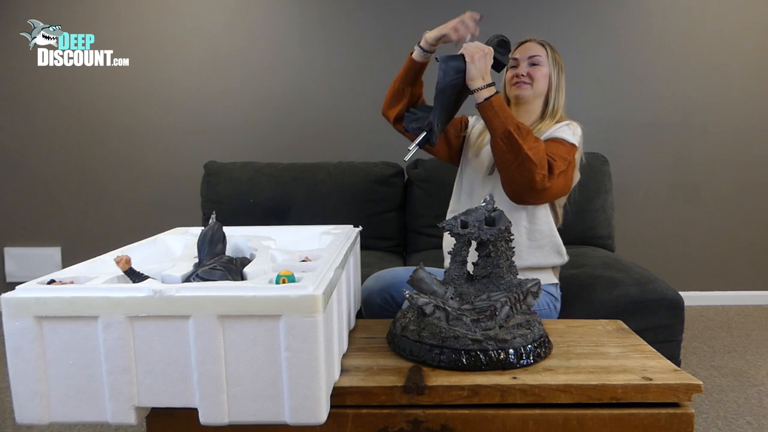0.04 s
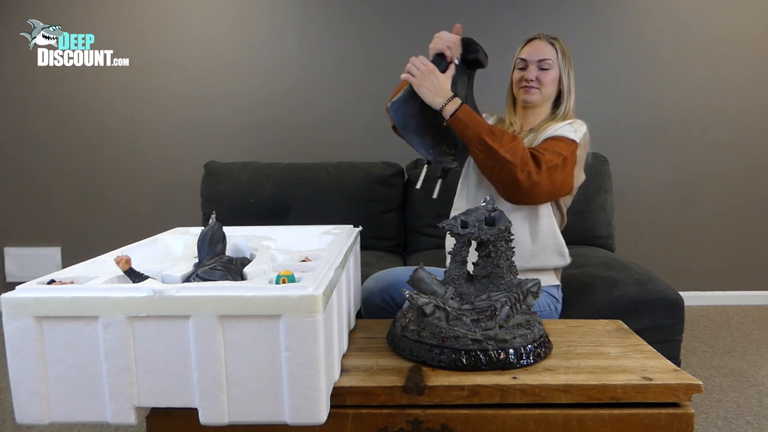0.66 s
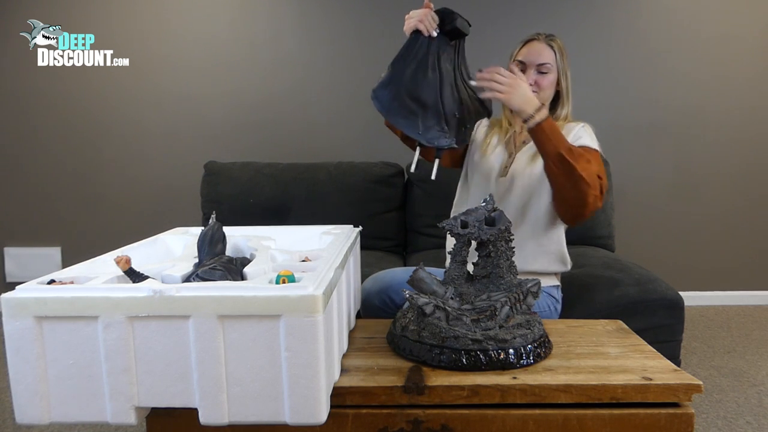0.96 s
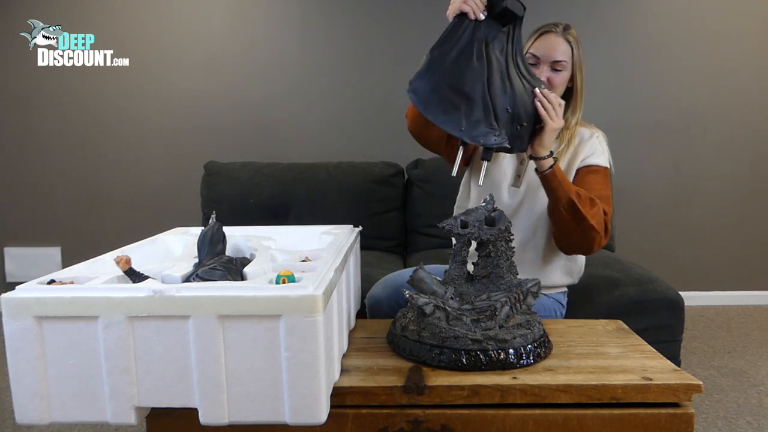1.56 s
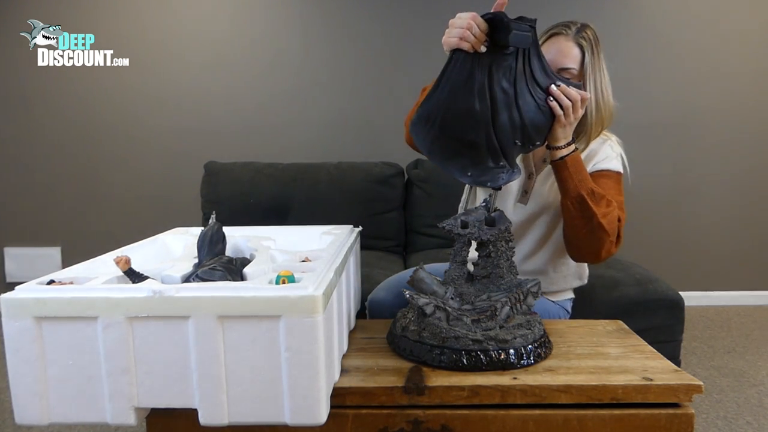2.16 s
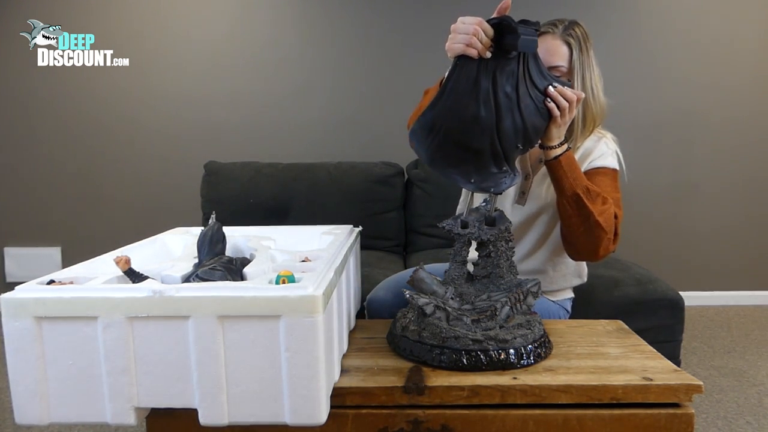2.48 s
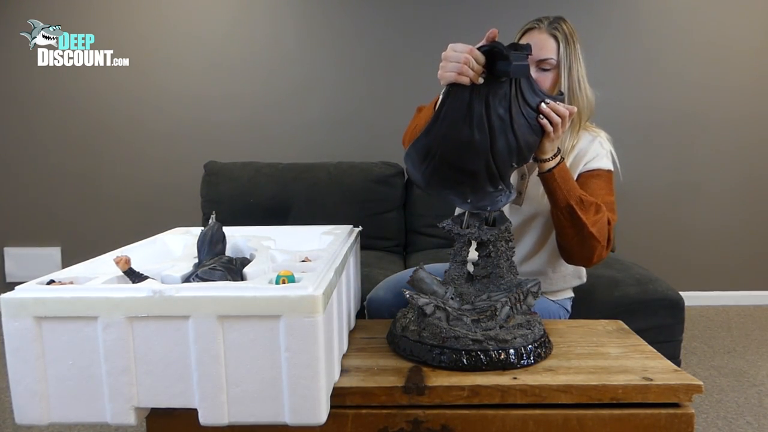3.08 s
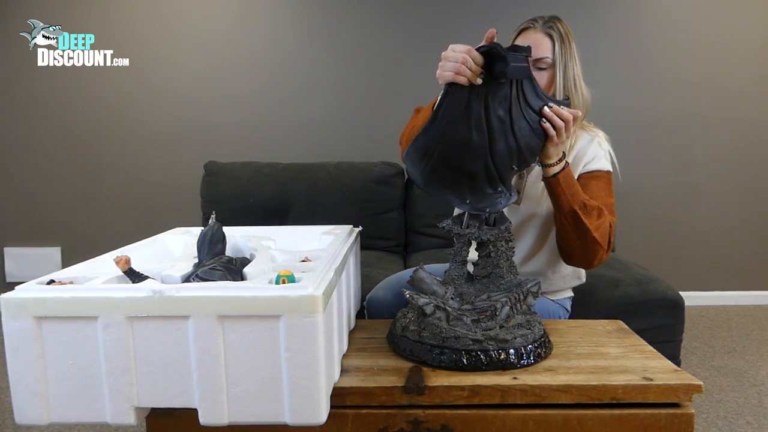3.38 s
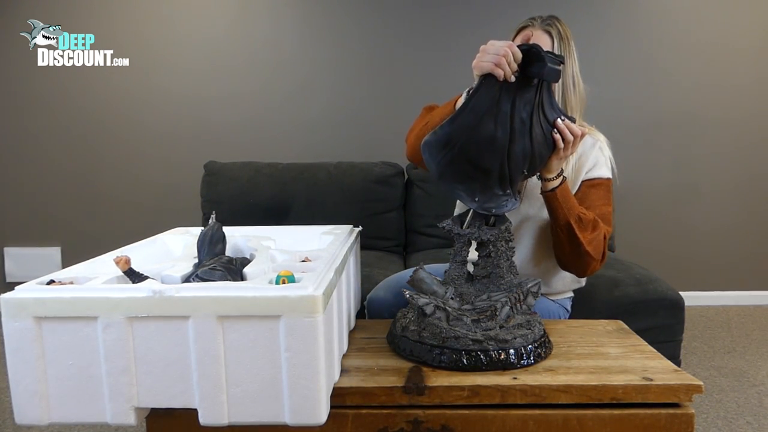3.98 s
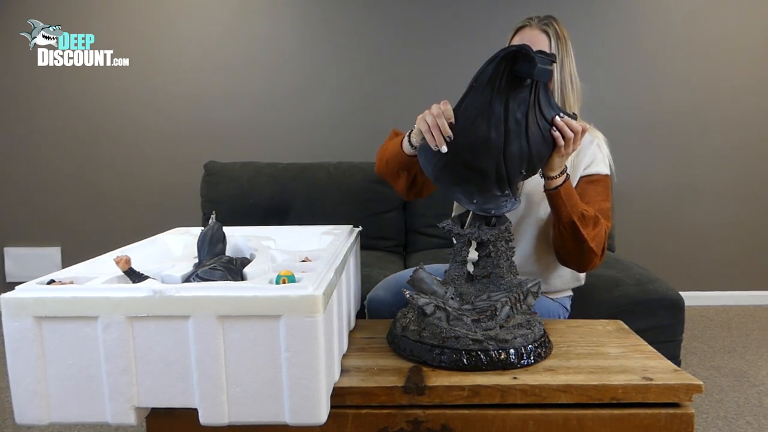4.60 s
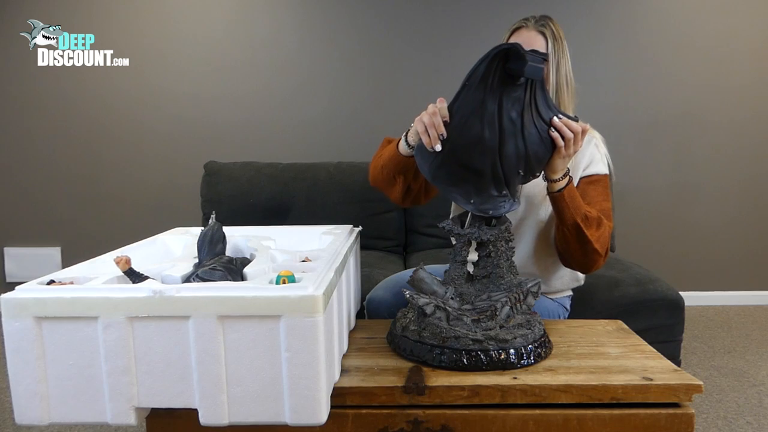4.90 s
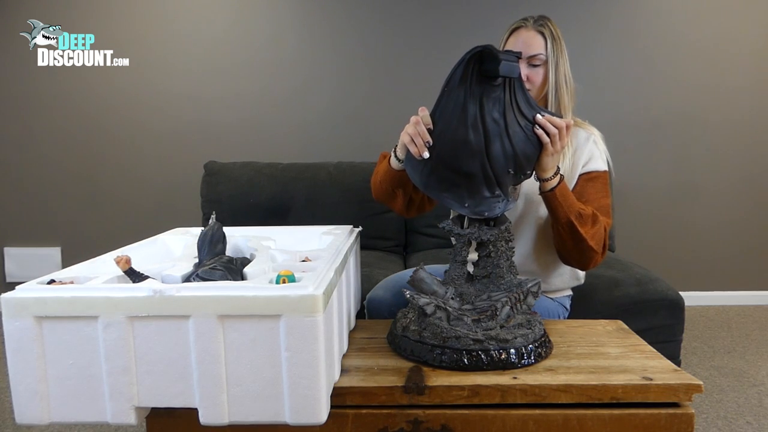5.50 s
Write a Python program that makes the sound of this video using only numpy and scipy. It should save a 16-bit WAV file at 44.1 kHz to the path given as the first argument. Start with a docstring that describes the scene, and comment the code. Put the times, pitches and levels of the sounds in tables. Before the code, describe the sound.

In a small living room, a heavy resin statue part is fitted onto its base on a wooden table. Quiet brushing of hands and cloth gives way to hard, hollow clacks with low wooden thumps. Metal pegs tap, squeak and scrape in search of their holes, then snap home after a sharp knock, ending in a short grind and a few clicks. The microphone holds everything centred over low room rumble and faint hiss.

```python
"""Fingers and sleeves rustle softly over a heavy, hollow resin statue piece as it is turned in the hands.
Then it lands on its base with a sharp clack: shell and base ring, and each blow thumps the wooden table.
Its steel pegs knock, skid and squeak over the base, grate in their sockets and snap home; resin grinds
on resin as it sinks in. All sits near mono in a small living room, over low rumble and faint mic hiss."""
import sys
import numpy as np
from scipy import signal
from scipy.fft import rfft, irfft, next_fast_len
from scipy.io import wavfile

SR = 44100
rng = np.random.default_rng(int(sys.argv[2]) if len(sys.argv) > 2 else 0)


def generate_wav(sig):
    """Save sig (samples, or channels by samples) to the path in sys.argv[1] as 16-bit PCM at SR."""
    pcm = np.round(np.clip(np.atleast_2d(sig).T, -1, 1) * 32767).astype(np.int16)
    wavfile.write(sys.argv[1], SR, pcm)


N = 249162
TIME = np.arange(N) / SR
RING_TIME = np.arange(2 ** 14) / SR

# The piece hits the base; each blow thumps the table at its own pitch:
# t/s, clack/dB, shell focus/Hz, focus boost/dB, hardness/dB, base knock/dB, table thump/dB, thump/Hz
BLOWS = [(1.178, -47.5, 1140, 8, 4.5, -52.5, -60, 302), (2.0414, -14, 2330, 13.5, -7.5, -26, -14.5, 237),
         (2.060, -37.5, 1130, 3, 10, -28.5, -19, 200), (2.0771, -23.5, 1440, 26, -15, -32, -28, 174),
         (2.088, -16.5, 2400, 11, -7.5, -30, -20, 170), (2.099, -22, 2320, 11, -8, -46, -20, 182),
         (2.275, -51, 1253, 10, -6, -50, -35.5, 129), (2.569, -34.5, 1130, 8, -1, -34.5, -20.5, 185),
         (2.582, -37.5, 3010, 7, 0.5, -36, -45, 152), (2.5988, -28.5, 1250, 8.5, 2.5, -32, -38, 165),
         (2.836, -18.5, 1970, 4.5, -9, -35, -14.5, 148), (2.928, -41, 1150, 15, -15, -45.5, -33, 157),
         (3.131, -38, 1170, 10, -11, -40, -30, 159), (3.166, -39.5, 1290, 17, -6, -33.5, -21.5, 127),
         (3.176, -43, 1130, 7, 3.5, -35, -20.5, 114), (3.202, -39.5, 1130, 7, -4, -39, -39, 152),
         (3.224, -40, 1130, 1, -22, -47, -48, 132), (3.290, -57, 1070, 0, -3, -46, -33.5, 144),
         (3.304, -62, 1290, 0, 4, -50, -30, 179), (3.78, -31, 1170, 0.5, -27.5, -41.5, -27, 153),
         (3.872, -55, 1270, 6, -18, -52, -33, 133), (3.885, -36.5, 1200, 7, -25, -50.5, -28, 120),
         (4.025, -64, 1160, 22, 0, -54, -36.5, 140), (4.106, -44.5, 1130, 23, -7, -48, -40.5, 125),
         (4.302, -42.5, 1070, 16, -1, -45.5, -32.5, 124), (4.362, -50.5, 1000, 8, -6, -40, -26, 200),
         (4.596, -49, 4130, 22, -4, -36.5, -41, 220), (4.61, -14.5, 2085, 17.5, -7.5, -28.5, -15.5, 255),
         (4.6258, -29.5, 2010, -1, -6, -27.5, -25, 250), (4.828, -57, 1130, 20, -5, -46, -31, 340),
         (4.965, -35.5, 1130, -2, -10, -34, -21.5, 169), (4.9892, -19, 1330, 13, -1, -30, -47, 194),
         (5.17, -46, 1095, 22, -21, -48.5, -35.5, 118), (5.3448, -38.5, 1880, 13, -14.5, -44.5, -38, 171),
         (5.4993, -49, 3240, 15, -7, -33, -24, 310), (5.510, -45, 3300, 12, 4, -38.5, -35, 300),
         (5.549, -37, 1120, 24, -16, -29.5, -22.5, 320), (5.577, -32, 2020, 13, -3.5, -33.5, -34, 280),
         (5.6166, -30, 1110, 8, -15, -45, -34, 290)]
# The piece sinks in: t/s, length/s, final grind/dB, swell/dB, final table shudder/dB
SINKS = [(4.024, 0.084, -55, -3.5, -52.5), (4.224, 0.25, -53.5, 2, -50.5), (4.805, 0.064, -47.5, 6, -33.5),
         (4.887, 0.075, -40, 7, -38), (5.301, 0.19, -52.5, 3.5, -51.5), (5.497, 0.14, -32.5, 13, -33)]
# Fingers and sleeves brush the piece: t/s, length/s, relative final level/dB
BRUSH_STROKES = [(-0.02, 0.071, -56.5), (0.18, 0.12, -56.5), (0.531, 0.011, -48), (0.568, 0.022, -51),
                 (0.588, 0.0099, -37.5), (0.621, 0.073, -51.5), (0.81, 0.043, -52.5), (0.91, 0.12, -63),
                 (1.22, 0.067, -53.5), (1.33, 0.11, -54), (1.44, 0.074, -49.5), (1.645, 0.13, -53),
                 (1.805, 0.04, -51.5)]
# A hand slides: centre t/s, half length/s, level/dB
HAND_SWISHES = [(0.198, 0.03, -55), (0.277, 0.07, -56.5), (1.461, 0.026, -59.5), (4.436, 0.11, -54)]
# Fingers and palms set the shell humming: t/s, f/Hz, level/dB, rise/s, t60/s
PALM_BUMPS = [(.591, 735, -38, 0.001, 0.1), (.655, 152, -43, 0.013, 0.52),
              (1.021, 150.7, -36.5, 0.036, 0.38), (1.179, 304, -33, 0.0022, 0.24),
              (1.336, 1195, -41.5, 0.0018, 0.055)]

# Ringing bodies: f/Hz, relative level/dB, t60/s
SHELL_MODES = [(1098.4, 3.5, 0.087), (1190, 2.5, 0.1), (1324, 1, 0.04), (1507, 3.5, 0.07), (1632, 2, 0.071),
               (1730, 3, 0.037), (1901, 7, 0.048), (2031, 4, 0.047), (2276, 14, 0.014), (2410, -1, 0.13),
               (2570, 5, 0.039), (2700, 10.5, 0.018), (3270, 4, 0.041), (3950, -1.5, 0.09),
               (4260, -17.5, 0.09), (4420, -41.5, 0.027)]  # hollow resin piece
BASE_MODES = [(446.5, -6, 0.18), (532.7, 2.5, 0.067), (642, -7, 0.065), (700.5, 3.5, 0.095),
              (730, -0.5, 0.017), (942, -8.5, 0.15)]  # solid base
TABLE_MODES = [(76.2, 1, 0.21), (99.4, 2.5, 0.24), (127.7, -6.5, 0.38), (151.2, -0.5, 0.17),
               (191.2, -1, 0.14), (253, 3, 0.085), (286.5, -9, 0.23), (328.7, -2, 0.13), (369, -1.5, 0.14),
               (403, 0, 0.081)]  # table under the statue's weight
# Peg resonances: f/Hz, width/Hz, relative level/dB
SOCKET_PEAKS = [(1410, 200, 1), (1820, 350, -5), (2430, 170, -0.5), (3020, 820, -3), (4110, 660, -3.5),
                (6170, 1400, -14.5), (9530, 3000, -17.5), (13100, 2600, -22.5)]  # steel in its socket
SQUEAK_PEAKS = [(1130, 32, 14), (1370, 70, 2.5), (1520, 60, 5), (3790, 110, -2.5)]  # steel skidding on the base
# Tone colours: f/Hz, relative level/dB
GRIT_EQ = [(600, -55), (1050, -9.5), (2400, -2), (3200, 2.5), (4200, 7), (4900, -9), (8000, -38)]  # dense overtones of the resin
CRACK_EQ = [(2000, -3), (4300, 4.5), (5300, 1), (6200, 1), (7200, -7), (8700, -2.5), (12000, -10.5),
            (16000, -17)]  # the point of contact
RUB_EQ = [(400, 0.5), (550, 0), (1200, 5), (2000, -10), (3000, -6), (4100, -3), (5200, -19), (9000, -22.5),
          (15000, -36)]  # scraped resin
BRUSH_EQ = [(200, -11.5), (500, 1), (1200, -4.5), (3000, 4.5), (4300, 1), (5500, -10.5), (8000, -13),
            (14000, -23)]  # skin and cloth
SWISH_EQ = [(1000, -32), (2400, -8.5), (3300, -8.5), (5000, -16.5), (6200, -11), (7200, -16), (8300, -19.5),
            (14000, -24.5)]  # sliding hand
RUMBLE_EQ = [(12, -32.5), (20, -1), (59, 1), (133, -3.5), (176, -4), (227, -5.5), (365, -6), (496, -11),
             (733, -12), (1210, -17), (1430, -18), (2650, -20.5), (6120, -29), (14500, -24), (15800, -26)]  # room tone
# Room decay: f/Hz, t60/s
REVERB_T60 = [(60, 0.14), (160, 0.37), (420, 0.26), (1100, .3), (2200, 0.33), (4200, 0.32), (5500, .24),
              (8000, .22), (15000, 0.11)]
# Reverb against the direct sound: f/Hz, level/dB
REVERB_EQ = [(60, -11.5), (250, 2.5), (700, -3.5), (2000, -9.5), (4300, -7.5), (6000, -6), (14000, -10)]
# Faint left-right difference that widens the sound slightly: f/Hz, relative level/dB
SIDE_EQ = [(100, -50), (250, -52.5), (600, -35), (2000, -35), (8000, -27.5)]

FRICTION_ATTACK_S = 0.012


def blow(clack_db, focus_hz, focus_db, hardness_db, knock_db, thump_db, thump_hz):
    """One hit: the shell's clack, the base's knock, a crack at the contact, the table's slower thump."""
    def strike_eq(hz):
        """The struck spot favours the modes near one pitch; a hard contact adds treble."""
        focus = np.exp(-(np.log2((hz + 1) / focus_hz) / 0.23) ** 2)
        return focus_db * focus + hardness_db * np.clip((hz - 1950) / 400, 0, 1)

    t = RING_TIME[:SR // 16]
    noise = rng.standard_normal((3, len(t)))
    grit = filtered(noise[0], lambda hz: amp(along(GRIT_EQ, hz) + strike_eq(hz))) * decay(t, 0.072)
    shell = unit(ring(SHELL_MODES, strike_eq)[:len(t)]) + 0.5 * unit(grit)
    touch = 1 + 0.36 * np.exp(-t / 0.011)  # loudest while the two parts still touch
    clack = burst(lowpass(touch * shell, edge_hz=4350, order=6), 0.015)  # the clack stays below the treble; the crack carries the top end
    rattle = coloured(noise[1], [(250, -14), (480, -15), (950, -9), (1500, -28)]) * decay(t, 0.093)
    base = unit(ring(BASE_MODES, scatter_db=2)[:len(t)]) + 1.74 * unit(rattle)
    knock = burst(lowpass(base, edge_hz=1900, order=3), 0.021)
    crack = burst(coloured(noise[2], CRACK_EQ) * decay(t, 0.051) * onset(t, 0.0021), 0.027)
    crack_db = clack_db - 14.5 + 1.64 * hardness_db  # a harder contact cracks more against its clack
    table = ring(TABLE_MODES, lambda hz: -3 * np.log2(hz / thump_hz) ** 2)
    hit = amp(thump_db) * burst(table * onset(RING_TIME, 0.0018), 0.024)
    add(hit, 0, amp(clack_db) * clack + amp(knock_db) * knock + amp(crack_db) * crack)
    return hit


def knocks():
    """Every blow comes from a slightly different spot and wakes the room anew."""
    track = np.zeros(N)
    for start, *voicing in BLOWS:
        add(track, start, in_room(blow(*voicing)))
    return track


def peg_snap(snap_s=4.988, grate_s=0.067, release_s=0.056):
    """Steel pegs grate ever louder in their sockets, then snap home."""
    grate = stroke(snap_s - grate_s, grate_s, db=-41.5, swell_db=14,
                   attack=FRICTION_ATTACK_S, release=release_s)
    snap = stroke(snap_s, length=0.01, db=-15, swell_db=0, attack=0.003, release=release_s)
    return (grate + snap) * resonate(grains(per_s=11000), SOCKET_PEAKS)


def peg_skid():
    """A peg sticks and slips over the base: it squeaks, rasps on the resin and shakes the table."""
    push = dict(start=2.915, length=0.22, attack=0.0097, release=0.067)
    slips = grains(per_s=8000)
    caught = grip(depth_db=3, rate_hz=65) * slips
    squeak = resonate(caught, SQUEAK_PEAKS) + amp(-12) * coloured(caught, RUB_EQ)
    shudder = coloured(shaken(slips, TABLE_MODES), [(100, 1), (200, -0.5), (400, -14)])
    return stroke(db=-36.5, swell_db=6, **push) * squeak + stroke(db=-29, swell_db=17, **push) * shudder


def resin_grind():
    """Rough resin grinds on resin and stirs the shell, the base and the table."""
    slips = grains(per_s=4500) * grip(depth_db=2.5, rate_hz=150)
    bodies = shaken(slips, SHELL_MODES) + shaken(slips, BASE_MODES)
    rasp = unit(coloured(slips, RUB_EQ) + 0.5 * bodies)
    shudder = shaken(slips, TABLE_MODES)
    track = np.zeros(N)
    for start, length, grind_db, swell_db, shudder_db in SINKS:
        push = stroke(start, length, 0, swell_db, FRICTION_ATTACK_S, release=0.14)
        track += push * (amp(grind_db) * rasp + amp(shudder_db) * shudder)
    return track


def hands():
    """Skin and cloth brush the piece and stir its shell; soft bumps leave a brief hum."""
    slips = grains(per_s=4400) * grip(depth_db=1.5, rate_hz=40)
    pressure = sum(stroke(*row, swell_db=-0.5, attack=0.0097, release=0.095) for row in BRUSH_STROKES)
    rustle = unit(coloured(slips, BRUSH_EQ) + 0.44 * shaken(slips, SHELL_MODES))
    swishes = sum(amp(db) * np.exp(-((TIME - centre) / half) ** 2) for centre, half, db in HAND_SWISHES)
    track = amp(-2.5) * pressure * rustle + swishes * coloured(grains(per_s=5200), SWISH_EQ)
    for start, hz, db, rise, t60 in PALM_BUMPS:
        envelope = amp(db) * onset(RING_TIME, rise) * decay(RING_TIME, t60)
        add(track, start, envelope * np.sin(2 * np.pi * hz * RING_TIME))
    return track


def in_room(x, predelay_s=0.0028):
    """x plus the small room's tail, each frequency dying at its own speed."""
    hz, t, noise = signal.stft(rng.standard_normal(len(RING_TIME)), SR, nperseg=256)
    t60 = along(REVERB_T60, hz)[:, None]
    gain = amp(along(REVERB_EQ, hz))[:, None] * np.sqrt(2 * np.log(1000) / (t60 * SR))
    tail = signal.istft(noise * gain * decay(t, t60), SR, nperseg=256)[1][:len(RING_TIME)]
    fade_in = np.clip(RING_TIME / predelay_s - 1, 0, 1)
    return x + signal.fftconvolve(x, tail * fade_in)[:len(x)]


def room_tone():
    """A bed of centred room rumble, with faint hiss of each channel's own."""
    rumble = amp(-52.5) * coloured(rng.standard_normal(N), RUMBLE_EQ)
    return rumble + amp(-65.5) * rng.standard_normal((2, N))


def ring(modes, strike_eq=np.zeros_like, scatter_db=1):
    """A struck body's damped modes, weighted by where the blow lands."""
    hz, db, t60 = np.transpose(modes)
    gain = amp(db + strike_eq(hz) + scatter_db * rng.standard_normal(len(hz)))
    gain[1::3] *= -1  # some modes swing against the others
    t = RING_TIME[:int(t60.max() * SR)]
    partials = decay(t, t60[:, None]) * np.sin(2 * np.pi * hz[:, None] * t)
    return np.pad(gain @ partials, (0, len(RING_TIME) - len(t)))


def shaken(x, modes):
    """x keeps a body's modes ringing, at rms 1."""
    return unit(signal.fftconvolve(x, ring(modes))[:N])


def resonate(x, peaks):
    """x through parallel resonances of alternating polarity, at rms 1."""
    def response(f):
        return sum((-1) ** k * amp(db) * 1j * f * width / (hz * hz - f * f + 1j * f * width)
                   for k, (hz, width, db) in enumerate(peaks))
    return unit(filtered(x, response))


def grains(per_s):
    """Tiny slips of uneven size at random moments."""
    return unit((rng.random(N) < per_s / SR) * rng.standard_normal(N))


def grip(depth_db, rate_hz):
    """Gain of a surface that catches and lets go unevenly."""
    return amp(depth_db * unit(lowpass(rng.standard_normal(N), rate_hz, order=2)))


def stroke(start, length, db, swell_db, attack, release):
    """Envelope of a push, times in seconds: it takes hold, swells up to db, then dies away."""
    t = TIME - start
    swell = amp(db + swell_db * (np.clip(t / length, 0, 1) - 1))
    return np.clip(t / attack, 0, 1) * swell * decay(np.maximum(t - length, 0), release)


def onset(t, rise_s):
    """A rounded attack."""
    return 1 - np.exp(-t / rise_s)


def decay(t, t60):
    """A fall of 60 dB every t60 seconds."""
    return amp(-60 * t / t60)


def amp(db):
    """Decibels to gain."""
    return 10 ** (np.asarray(db) / 20)


def unit(x):
    """x at rms 1."""
    return x / np.sqrt(np.mean(x ** 2) + 1e-20)


def burst(x, seconds):
    """x with the energy of a sound of rms 1 that lasts so long."""
    return unit(x) * np.sqrt(seconds * SR / len(x))


def along(points, hz):
    """A curve of (f/Hz, value) points read on a log axis."""
    f, values = np.transpose(points)
    return np.interp(np.log(hz + 1), np.log(f), values)


def filtered(x, response):
    """x through a frequency response."""
    n = x.shape[-1]
    padded = next_fast_len(n + 4096)
    return irfft(rfft(x, padded) * response(np.fft.rfftfreq(padded, 1 / SR)), padded)[..., :n]


def coloured(x, eq):
    """x through an EQ curve of (f/Hz, level/dB) points, at rms 1."""
    return unit(filtered(x, lambda hz: amp(along(eq, hz))))


def lowpass(x, edge_hz, order):
    """x with the top rolled off."""
    return signal.sosfilt(signal.butter(order, edge_hz, fs=SR, output="sos"), x)


def add(track, start_s, x):
    """Mix x into the track."""
    part = track[max(round(start_s * SR), 0):][:len(x)]
    part += x[:len(part)]


def scene():
    """The handling sits centred, with a faint stereo spread."""
    handling = knocks() + in_room(peg_skid() + resin_grind() + peg_snap() + hands())
    low_cut = signal.butter(4, 60, "high", fs=SR, output="sos")  # the table radiates little deep bass
    handling = signal.sosfilt(low_cut, handling)
    side = filtered(in_room(handling) - handling, lambda hz: amp(along(SIDE_EQ, hz)))
    side += amp(-78) * coloured(rng.standard_normal(N), RUMBLE_EQ)
    return handling + np.array([side, -side]) + room_tone()


def record(dry):
    """Clip at full scale and cut everything above 16 kHz."""
    return filtered(np.clip(dry, -1, 1), lambda hz: hz < 16000)


dry = scene()
out = record(dry)
generate_wav(out)
```